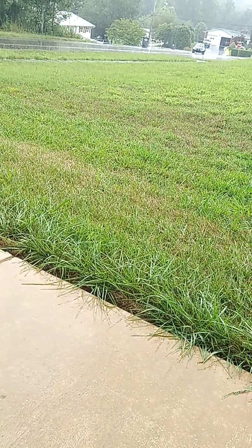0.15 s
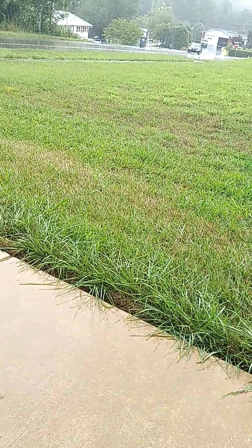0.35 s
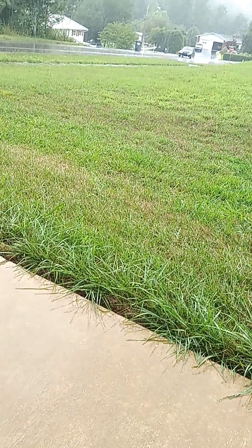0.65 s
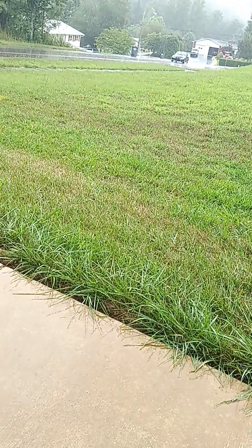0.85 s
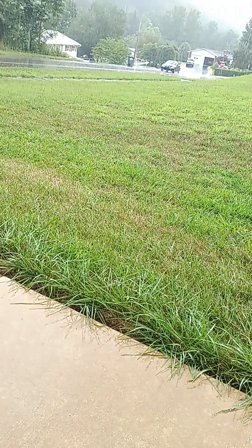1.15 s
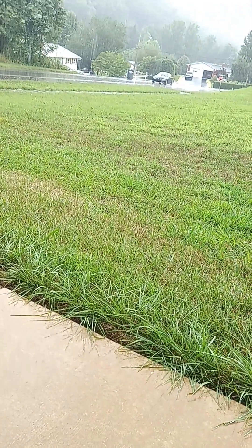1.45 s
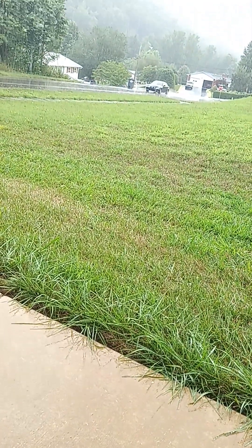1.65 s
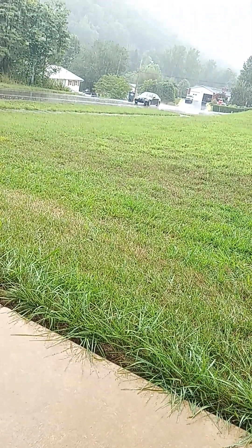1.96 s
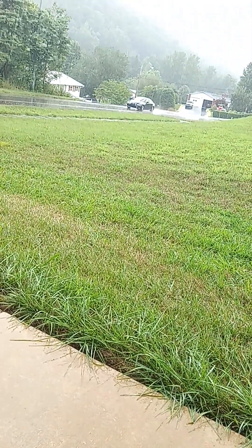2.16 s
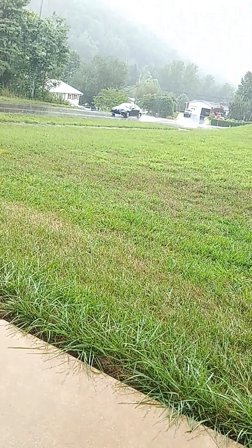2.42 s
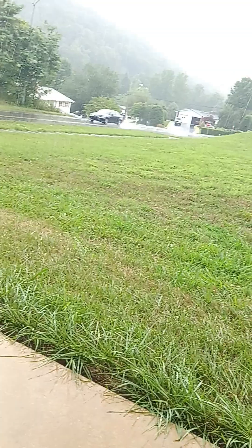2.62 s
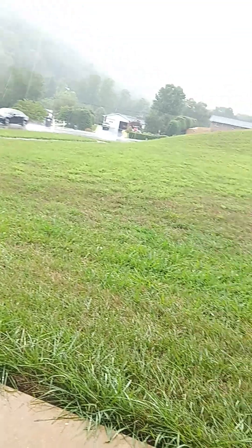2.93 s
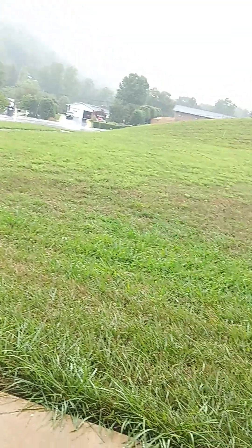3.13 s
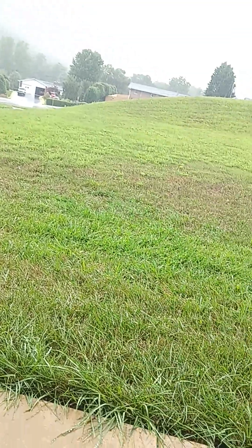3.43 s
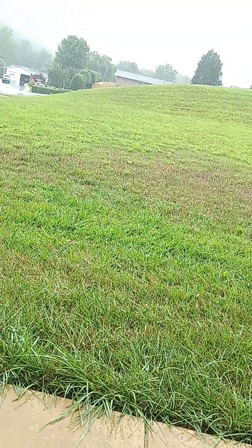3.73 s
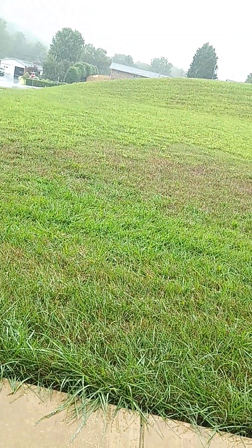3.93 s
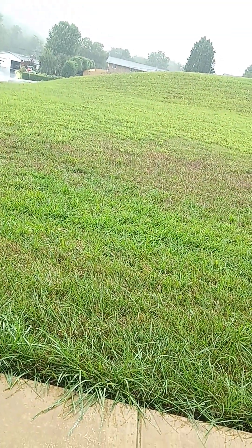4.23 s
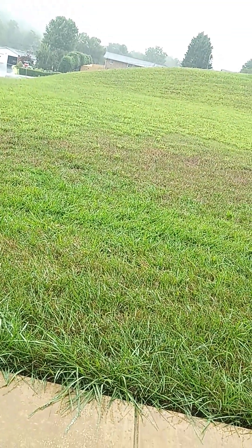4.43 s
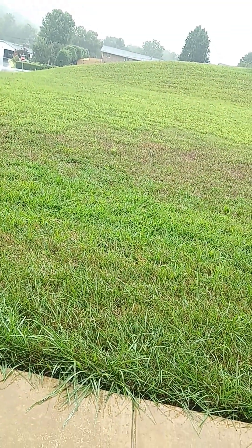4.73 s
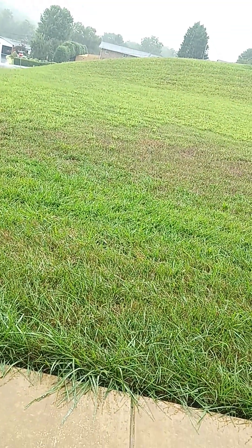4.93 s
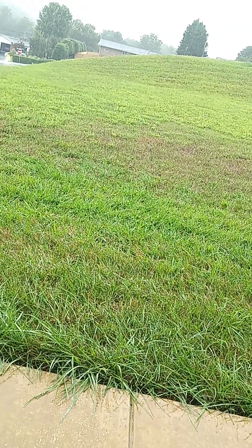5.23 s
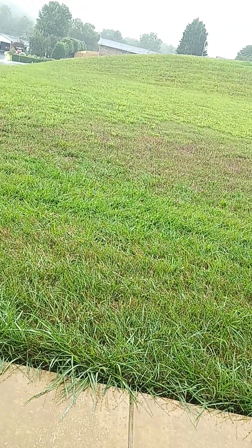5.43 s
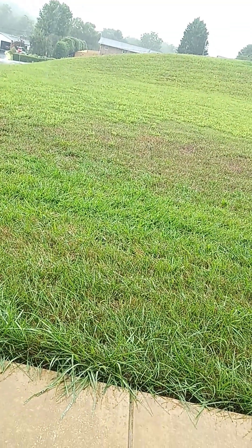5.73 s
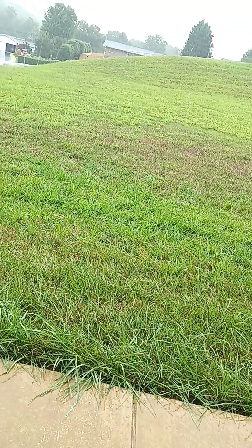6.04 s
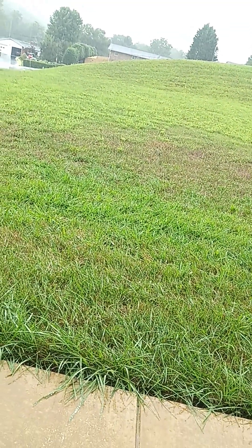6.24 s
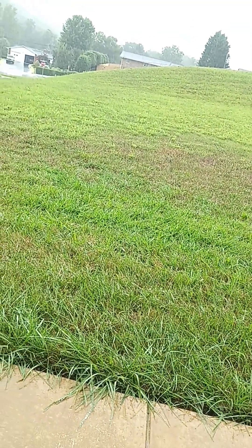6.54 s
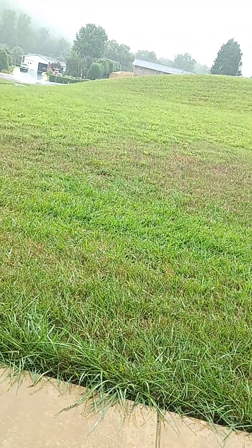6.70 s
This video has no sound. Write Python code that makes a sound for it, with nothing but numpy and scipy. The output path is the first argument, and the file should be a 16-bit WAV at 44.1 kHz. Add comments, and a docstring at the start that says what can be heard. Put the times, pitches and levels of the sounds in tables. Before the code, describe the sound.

Outdoors in a downpour, a broad watery hiss of tyres on flooded road rises, holds, then fades back into rainfall.

```python
"""On the pavement beside a lawn in heavy rain, heard by the two ports of a hand-held phone.
Rain is a wash of noise with a patter of random impacts; near drops and ticks are tiny noise bursts.
A broad hiss, most likely spray from a car's tyres on the flooded road, swells over a low roar, then drops away.
The hiss reaches the ports at different times, directly and off a wall, with short echoes and gliding notches.
Rumble and exhaust drone lie beneath it; bumps of the hand are short low wobbles at the left port."""
import sys
import numpy as np
from scipy import signal
from scipy.fft import rfft, irfft, next_fast_len
from scipy.io import wavfile
from scipy.ndimage import map_coordinates

SR = 44100
rng = np.random.default_rng(int(sys.argv[2]) if len(sys.argv) > 2 else 0)


def put_to_file(sound):
    """Save the sound as 16-bit audio at rate SR, in the file named by the first command-line argument."""
    columns = np.atleast_2d(sound).T  # one column per channel
    safe = np.clip(columns, -1, 1)
    whole_steps = np.round(safe * 32767)
    wavfile.write(sys.argv[1], SR, whole_steps.astype(np.int16))


N = 302958
TIME = np.arange(N) / SR  # seconds
PADDED = next_fast_len(N, True)
FREQS = np.arange(PADDED // 2 + 1) * SR / PADDED  # Hz

# Levels of the sources in dB are set before mixing, echoes and the phone's shading.
# A "length" in seconds spans a swell between the points where it is down to 37 %.

# Rain colour. Each row: pitch in Hz, relative level in dB per Hz.
RAIN_COLOUR = [(25, -36), (46, -21), (72, 4), (220, -2.5), (420, -9.5), (600, -5), (900, 0), (1300, -1.5),
               (2000, -2), (3000, -9.5), (5000, -14), (8500, -9.5), (13000, -17), (16000, -23)]
RAIN_DB, RAIN_SWELL_DB = -42.5, 0.5  # level, and typical size of its wavering
HUM_HZ, HUM_WIDTH_HZ, HUM_DB = 766, 5.3, -60
TICKS_PER_S, TICK_DB = 26, -61.5

# Near drops. Each row: start in seconds, peak in dB, left minus right in dB.
DROPS = [(0.082, -34, 2), (0.222, -39, -8), (0.711, -25, 4), (0.903, -29.5, 2.5), (1.209, -35, 12),
         (1.403, -35, 6), (2.088, -27.5, 2), (3.122, -23, 3), (3.162, -19, -2), (3.3, -20, 4),
         (3.864, -16, 1), (5.469, -41, 7), (5.529, -37, 8), (6.169, -34, 10), (6.334, -35, -5),
         (6.700, -34, -9)]
DROP_HZ, DROP_DECAY_S = 8600, 0.0041  # lower edge of a drop's splat, and how fast it dies

# Bumps of the hand. Each row: start in seconds, envelope peak in dB, pitch in Hz, rise in seconds.
BUMPS = [(0.593, -27.5, 145, 0.0019), (0.611, -39.5, 87, 0.014), (.655, -47, 140, 0.0055),
         (0.755, -23, 112, 0.003), (.792, -40, 110, 0.006), (0.839, -35.5, 88, 0.012),
         (.908, -36.5, 72, 0.008)]
# The grip rubs around the bumps: level, moment, length.
GRIP_DB, GRIP_S, GRIP_LENGTH_S = -42.5, 0.76, 0.45

# Rumble colour. Each row: pitch in Hz, relative level in dB per Hz.
RUMBLE_COLOUR = [(25, -40), (45, -31), (70, 2), (125, -2), (180, -4), (280, 3), (450, -7.5), (650, -21),
                 (1200, -17.5)]
# Rumble when the spray is strongest, and its change in dB per dB of spray.
RUMBLE_DB, RUMBLE_GROWTH = -44.5, 0.46
# Exhaust drone bands. Each row: pitch in Hz, width in Hz, level in dB, loudest moment in seconds,
# length in seconds.
DRONE_BANDS = [(72.3, 12, -55.5, 1.1, 3.3), (126, 5.7, -52.5, 2.81, 1.6), (109.8, 32, -51.5, 4.98, 1.1),
               (239, 12, -49.5, 4.06, 0.55), (230.5, 16, -46.5, 5.15, 0.6), (518, 60, -48, 5.12, 1.2)]

# Spray builds as the car nears and dies behind it. Each row: time in seconds, level of the hiss in dB.
SPRAY_LEVEL = [(0, -48), (0.65, -36), (1.3, -36), (2.3, -34), (3.0, -27), (3.55, -25.5), (4.25, -27.5),
               (4.98, -26.5), (5.17, -31.5), (5.5, -39.5), (5.68, -45), (6.87, -60.5)]
# Spray colour. Each row: pitch in Hz, relative level in dB per Hz.
SPRAY_COLOUR = [(800, -15.5), (1500, -5.5), (2200, -3), (3000, -3), (3500, -3.5), (4200, -2), (5200, -3.5),
                (6200, -5), (7700, 0), (9300, -0.5), (10700, -1.5), (12500, -6), (16000, -10.5)]
# Coarse splash and fine mist against the hiss, when the spray is strongest.
SPLASH_DB, MIST_DB = -4.5, -5.5
SPLASH_GROWTH, MIST_GROWTH = 0.16, 0.56  # dB that each gains on the hiss per dB of spray
MIST_LAG_MS = 240  # fine mist hangs in the air and trails the spray
# Coarse water keeps falling behind the car: moment, length, extra splash.
WAKE_S, WAKE_LENGTH_S, WAKE_DB = 6.43, 2.84, 5.5
# The tyres run through deeper water. Each row: moment in seconds, length in seconds,
# change of the hiss in dB, change of the roar in dB.
PUDDLES = [(0.767, 0.11, 2, 12.5), (1.396, 0.084, 1, -6), (1.91, 0.18, 2.5, 4.5), (2.14, 0.15, 2.5, 6),
           (2.38, 0.11, 2.5, -9), (2.535, 0.13, 4, -3), (2.89, 0.068, 2, -8), (3.345, 0.063, 1.7, 0),
           (4.498, 0.053, 0, 0.5), (4.765, 0.1, 2.5, -2)]

PASSES_S, ROAD_M, SPEED_M_S = 4.55, 11, 15  # the car's nearest moment, its distance then, its speed
ROAR_DB, ROAR_FAR_HZ, ROAR_NEAR_HZ = -38, 1006.3, 1451.6  # roar: level when nearest; duller from afar
# Upper band of the roar while the car approaches; its level is against the roar.
WHINE_HZ, WHINE_WIDTH_HZ, WHINE_DB, WHINE_S, WHINE_LENGTH_S = 1864, 130, 3.5, 1.6, 2.2

# Bearing of the car as the phone turns. Each row: time in seconds, lag of the left port in ms.
BEARING = [(0, .725), (.7, .753), (1.75, .817), (2.45, .818), (2.8, .81), (3.4, .769), (4, .754),
           (6.8, .757)]
BASS_LAG_MS = .8  # lag of the left port for the bass of the rain and the rumble
# Below this pitch the scattered hiss loses this share while the car is in clear view.
SCATTER_HZ, SCATTER_CUT = 7500, .85
CLEAR_S, CLEAR_LENGTH_S = 1.8, 5.6  # moment and length of the clearest view
HIDDEN_S, HIDING_S = 5.35, .13  # the car goes out of direct earshot: moment, fade
HIDDEN_SCATTER_DB = 1.5  # rise of the scattered sound, which then takes over

# A wall, most likely the house, returns the passing car from the other side.
WALL_S, WALL_LENGTH_S, WALL_DB = 4.1, 2.1, -6.5  # strongest moment, length, level against the direct sound
# Detour, lag of the right port and its drift.
WALL_DELAY_MS, WALL_LAG_MS, WALL_GLIDE_MS_PER_S = 43, .15, -.06

# Two short echoes off hand and body at the left port, as the phone swings.
# Each row of each echo: time in seconds, delay in ms, gain as a plain factor.
LEFT_ECHOES = [
    [(.7, .55, .08), (1.6, .612, .18), (2.15, .616, .2), (2.5, .63, .05), (3.1, .684, .34), (3.6, .71, .3),
     (4, .72, .13), (4.4, .74, .2), (5.2, .704, .12)],
    [(2.3, 1.085, .05), (2.8, 1.056, .19), (3.1, 1.02, .18), (3.7, .988, .13), (4.6, .92, .04)],
]
# Three short echoes at the right port. Each row of each echo: time in seconds, delay in ms, gain.
RIGHT_ECHOES = [
    [(.5, .354, .22), (1.2, .4, .2), (2.1, .398, .18), (3.1, .385, .16), (4, .36, .02)],
    [(1.8, .665, .1), (2.5, .62, .08), (2.8, .64, .2), (3.35, .655, .2), (3.7, .628, .11), (4, .66, .02),
     (4.4, .684, .17), (5, .65, .05)],
    [(2.7, .92, .04), (3.7, .945, .09), (4, .92, .05), (4.4, .884, .2), (4.8, .868, .25), (5.3, .845, .1)],
]
# A later echo, probably off the pavement, as the car goes by. Each row: time in seconds, delay in ms, gain.
GROUND_ECHO = [(3.9, 3.0, 0), (4.5, 3.25, .12), (4.8, 3.35, .2), (5.1, 3.45, .22), (5.4, 3.73, .24),
               (5.8, 3.9, 0)]

# Band that cancels at the right port. Each row: time in seconds, centre in Hz,
# depth (1 is a full null, more turns the band over).
RIGHT_NOTCH = [(0, 7100, .65), (1.2, 6720, .7), (1.8, 6430, .75), (2.5, 6120, .5), (2.8, 5520, .7),
               (3.5, 5420, .6), (4.1, 5120, .8), (4.8, 5120, 1.05), (5.6, 5220, .75), (6.8, 5250, .55)]
# Three more such bands for the car's direct sound alone. Each row: time in seconds, centre in Hz, depth.
DIRECT_NOTCHES = [
    [(0, 2900, .2), (2.5, 2850, .25), (3.1, 2900, .5), (4.1, 3050, .5), (5, 3100, .2)],
    [(0, 4050, .35), (2.6, 3700, .3), (3.3, 3830, 1.7), (4.1, 3950, 1.7), (4.5, 4200, .6), (5, 4300, .1)],
    [(0, 9100, .5), (2.2, 8700, .5), (2.6, 7200, 0), (3.1, 6950, .6), (4.1, 7150, .6), (5.1, 7450, .7)],
]
NOTCH_WIDTH_HZ = 640

# The phone's body shades the right port. Each row: pitch in Hz, level change in dB.
SHADE = [(80, -3.5), (250, -2.5), (450, 1.5), (750, -3), (1200, -9.5), (1600, -9), (1950, -12),
         (2300, -3.5), (2700, -5), (3600, 0), (4400, -3.5), (5200, -0.5), (6500, -3.5), (9000, -3),
         (15000, -4.5)]
# The hand dulls the car at the right port for a while: edge, level change above it, moment, length.
PALM_HZ, PALM_DB, PALM_S, PALM_LENGTH_S = 7600, -5, 1.9, 1.5
TOP_HZ = 15900  # highest pitch that the phone keeps


def undb(db):
    """Turn decibels into a gain."""
    return 10 ** (np.asarray(db) / 20)


def unit(x):
    """Scale to an average strength (rms) of 1."""
    return x / np.sqrt(np.mean(x ** 2))


def curves(rows):
    """Draw straight lines between the rows of a timed table, giving each column sample by sample."""
    s, *columns = np.transpose(rows)
    return [np.interp(TIME, s, column) for column in columns]


def swell(s, length_s):
    """A smooth rise to 1 and fall around a moment."""
    return np.exp(-(2 * (TIME - s) / length_s) ** 2)


def colour(x, points):
    """Filter by a spectrum of pitches and levels."""
    hz, db = np.transpose(points)
    level_db = np.interp(np.log(FREQS + 1), np.log(hz), db)
    return irfft(rfft(x, PADDED) * undb(level_db), PADDED)[:N]


def below(x, hz, order=4):
    """Keep the low pitches without delay, so that x minus the result keeps the high ones."""
    return irfft(rfft(x, PADDED) / (1 + (FREQS / hz) ** (2 * order)), PADDED)[:N]


def delay(x, ms):
    """Delay by a fixed or moving time."""
    return map_coordinates(x, [np.arange(N) - ms * SR / 1000], order=5, mode="mirror")


def walk(rate):
    """Slow random wavering of rms 1, changing about rate times a second."""
    return unit(below(rng.standard_normal(N), rate, order=2))


def patter(rate, spread_db):
    """Impacts at random moments, rate per second, many small and a few large."""
    hit = rng.random(N) < rate / SR
    size_db = spread_db * np.minimum(rng.exponential(size=N), 4)
    return unit(hit * rng.standard_normal(N) * undb(size_db))


def resonance(centre_hz, width_hz):
    """Noise ringing in a band whose centre may move; rms 1."""
    def slow_noise():
        """Slow noise that gives the band its width once it is shifted up in pitch."""
        return below(below(rng.standard_normal(N), width_hz, order=1), 17.0 * width_hz, order=2)

    a, b = slow_noise(), slow_noise()
    phase = 2 * np.pi * np.cumsum(centre_hz * np.ones(N)) / SR
    return unit(a * np.cos(phase) + b * np.sin(phase))


def draught():
    """Moving air flutters faintly at each port on its own."""
    air = np.array([below(rng.standard_normal(N), 166, order=2) for _ in range(2)])
    return np.array([unit(a - below(a, 44)) for a in air]) * undb(-66.5 + 2 * walk(2.5))


def hum():
    """A faint, wavering far-off tone under the rain."""
    return np.array([resonance(HUM_HZ, HUM_WIDTH_HZ) for _ in range(2)]) * undb(HUM_DB)


def rain():
    """Far drops merge into a wash, nearer ones patter on the grass; only the bass is alike at both ports."""
    bass = below(rng.standard_normal(N), 630)
    ports = []
    for lag_ms in (BASS_LAG_MS, 0):
        wash = rng.standard_normal(N)
        near = patter(1500, 1.0)
        falling = wash - below(wash, 480) + undb(-6.5) * (near - below(near, 1960))
        ports.append(unit(colour(delay(bass, lag_ms) + falling, RAIN_COLOUR)))
    return np.array(ports) * undb(RAIN_DB + RAIN_SWELL_DB * walk(9.8))


def ticks():
    """Smaller drops tick on the pavement at random, separately at each port."""
    t = TIME[:SR // 100]
    ports = []
    for _ in range(2):
        sizes = undb(2.8 * rng.standard_normal(N).clip(-2, 2))
        hits = (rng.random(N) < TICKS_PER_S / SR) * sizes
        envelope = signal.fftconvolve(hits, np.exp(-t / .001))[:N]
        splats = envelope * rng.standard_normal(N)
        ports.append(unit(splats - below(splats, 6000, order=2)))
    return np.array(ports) * undb(TICK_DB)


def drops():
    """Single drops slap the wet pavement: a bright burst a few milliseconds long."""
    out = np.zeros((2, N))
    t = TIME[:SR // 20]
    bright = signal.butter(2, DROP_HZ, "high", fs=SR, output="sos")
    for s, db, pan_db in DROPS:
        burst = rng.standard_normal(len(t)) * np.exp(-t / DROP_DECAY_S)
        splat = signal.sosfilt(bright, burst)
        splat = splat / abs(splat).max()
        gains = undb(db + np.array([pan_db, -pan_db]) / 2)  # left, right
        i = int(s * SR)
        out[:, i:i + len(t)] += np.outer(gains, splat)[:, :N - i]
    return out


def bumps():
    """Each bump rocks the phone for a few cycles, over the rub of the shifting grip."""
    rub = unit(below(rng.standard_normal(N), 136, order=2))
    out = undb(GRIP_DB) * swell(GRIP_S, GRIP_LENGTH_S) * rub
    for s, db, hz, rise_s in BUMPS:
        t = np.maximum(TIME - s, 0)
        envelope = t / rise_s * np.exp(1 - t / rise_s)  # peaks at 1
        out -= undb(db) * envelope * np.sin(2 * np.pi * hz * t)
    return out - below(out, 46, order=6)


def echo(x, path):
    """A short reflection whose delay and strength change over time."""
    ms, gain = curves(path)
    return gain * delay(x, ms)


def notch(x, path):
    """Sound bending round the phone cancels in a narrow band, which glides as the phone turns."""
    centre_hz, depth = curves(path)
    turn = np.exp(2j * np.pi * np.cumsum(centre_hz) / SR)
    pole = np.exp(-np.pi * NOTCH_WIDTH_HZ / SR)
    # Shift the band down to zero pitch, smooth away the rest, and shift it back.
    band = 2 * np.real(turn * signal.lfilter([1 - pole], [1, -pole], x / turn))
    return x - depth * band


def engine():
    """A low rumble that comes and goes with the spray, and exhaust drone in bands that swell in turn."""
    (spray_db,) = curves(SPRAY_LEVEL)
    rumble_db = RUMBLE_DB + RUMBLE_GROWTH * (spray_db - spray_db.max())
    out = unit(colour(rng.standard_normal(N), RUMBLE_COLOUR)) * undb(rumble_db)
    for hz, width_hz, db, s, length_s in DRONE_BANDS:
        out = out + undb(db) * swell(s, length_s) * resonance(hz, width_hz)
    return out


def spray(level_db, splash_db, mist_db):
    """Droplets torn from the tyres: coarse splash below the main hiss, fine mist above it."""
    source = rng.standard_normal(N) + undb(-4.0) * patter(5000, 2.1)
    droplets = colour(source, SPRAY_COLOUR)
    splash = below(droplets, 5690, order=6)
    mist = droplets - below(droplets, 10250, order=8)
    hiss = droplets - splash - mist
    return undb(level_db) * (unit(hiss) + undb(splash_db) * unit(splash) + undb(mist_db) * unit(mist))


def tyres():
    """Three voices each of spray hiss and tread roar; puddles change both, the roar goes as 1 / distance."""
    (spray_db,) = curves(SPRAY_LEVEL)
    near = ROAD_M / np.hypot(ROAD_M, SPEED_M_S * (TIME - PASSES_S))  # 1 when nearest
    hiss_db = spray_db + 0.76 * walk(51) + 0.64 * walk(13.6)  # the water lies unevenly on the road
    roar_db = ROAR_DB + 0.15 * walk(19.0)
    for s, length_s, hiss_change_db, roar_change_db in PUDDLES:
        hiss_db = hiss_db + hiss_change_db * swell(s, length_s)
        roar_db = roar_db + roar_change_db * swell(s, length_s)

    strength_db = spray_db - spray_db.max()
    splash_db = SPLASH_DB + SPLASH_GROWTH * strength_db + WAKE_DB * swell(WAKE_S, WAKE_LENGTH_S)
    late_strength_db = np.interp(TIME - MIST_LAG_MS / 1000, TIME, strength_db)
    mist_db = MIST_DB + MIST_GROWTH * late_strength_db + 1.0 * walk(17.0)  # the finest spray comes in puffs
    hiss = np.array([spray(hiss_db, splash_db, mist_db) for _ in range(3)])

    centre_hz = ROAR_FAR_HZ + (ROAR_NEAR_HZ - ROAR_FAR_HZ) * near
    roar = np.array([resonance(centre_hz, 334) for _ in range(3)])  # air pumped out of the tread
    whine = undb(WHINE_DB) * swell(WHINE_S, WHINE_LENGTH_S) * resonance(WHINE_HZ, WHINE_WIDTH_HZ)
    roar[0] += whine
    return hiss, roar * near * undb(roar_db)


def car():
    """Spray and roar arrive directly, off a wall and scattered; short echoes comb them at each port."""
    hiss, roar = tyres()
    rumble = engine()
    (lag_ms,) = curves(BEARING)

    # The first voice travels directly; the other two are scattered, one for each port.
    hidden = 1 / (1 + np.exp((HIDDEN_S - TIME) / HIDING_S))
    direct = (undb(-2.5) * hiss[0] + undb(-3.5) * roar[0]) * np.sqrt(1 - hidden)
    clear = SCATTER_CUT * swell(CLEAR_S, CLEAR_LENGTH_S)
    fine = hiss[1:] - clear * np.array([below(h, SCATTER_HZ, order=2) for h in hiss[1:]])
    scattered = (undb(-3.0) * fine + undb(-3.5) * roar[1:]) * undb(HIDDEN_SCATTER_DB * hidden)
    wall = undb(WALL_DB) * swell(WALL_S, WALL_LENGTH_S) * delay(direct, WALL_DELAY_MS)
    wall_lag_ms = WALL_LAG_MS + WALL_GLIDE_MS_PER_S * (TIME - WALL_S)

    bent = direct
    for path in DIRECT_NOTCHES:
        bent = notch(bent, path)
    left = delay(direct, lag_ms) + wall + scattered[0]
    right = bent + delay(wall, wall_lag_ms) + scattered[1]

    palm_gain = undb(PALM_DB * swell(PALM_S, PALM_LENGTH_S))
    right = right + (palm_gain - 1) * (right - below(right, PALM_HZ))
    left = left + sum(echo(left, path) for path in LEFT_ECHOES + [GROUND_ECHO])
    right = right + sum(echo(right, path) for path in RIGHT_ECHOES + [GROUND_ECHO])
    return np.array([left + delay(rumble, BASS_LAG_MS), right + rumble])


def scene():
    """Everything at the two ports: the left one under the fingers, the right one in the phone's shade."""
    left, right = draught() + hum() + rain() + ticks() + car()
    shaded = notch(colour(right, SHADE), RIGHT_NOTCH)
    return np.array([left + bumps(), shaded]) + drops()


def record(dry):
    """The phone cuts the deepest bass and the top."""
    dry = dry - np.array([below(port, 43) for port in dry])
    return signal.sosfilt(signal.ellip(12, .1, 70, TOP_HZ, fs=SR, output="sos"), dry)


dry = scene()
out = record(dry)
put_to_file(out)
```